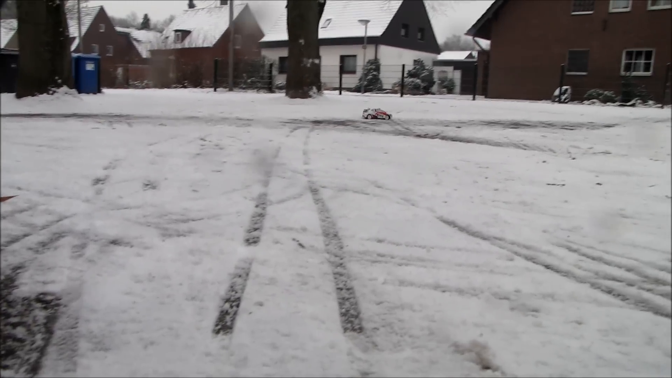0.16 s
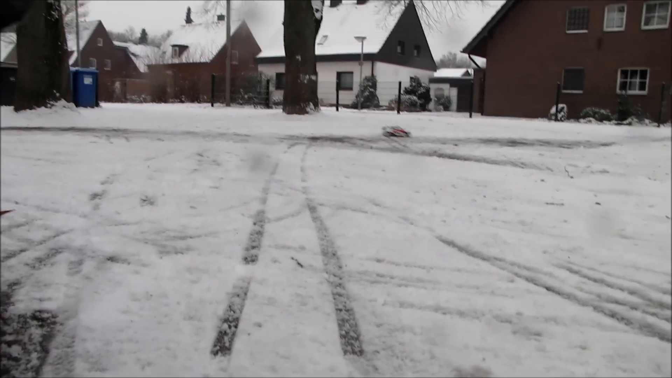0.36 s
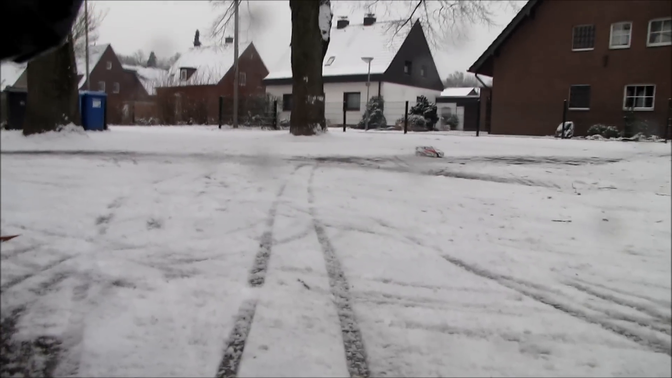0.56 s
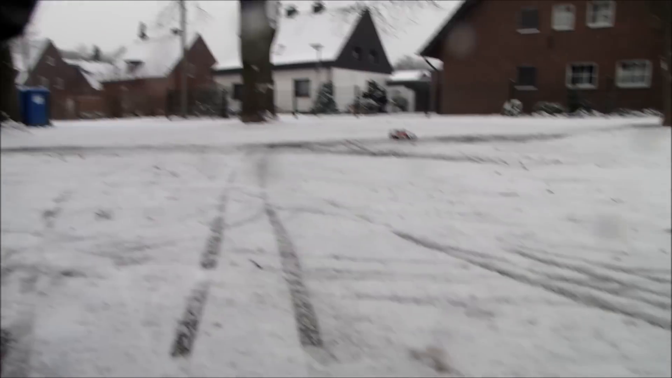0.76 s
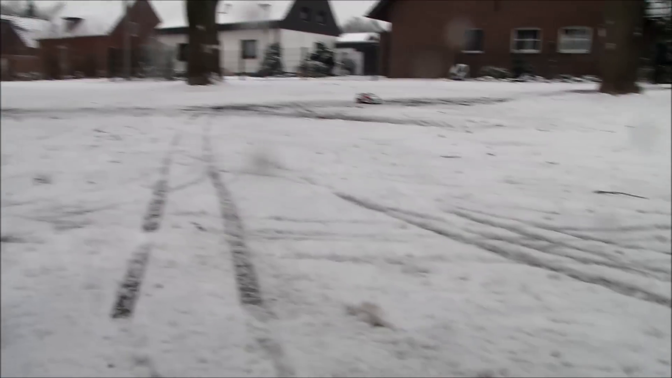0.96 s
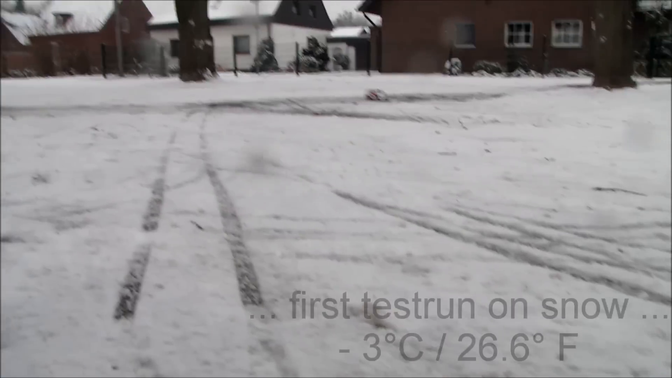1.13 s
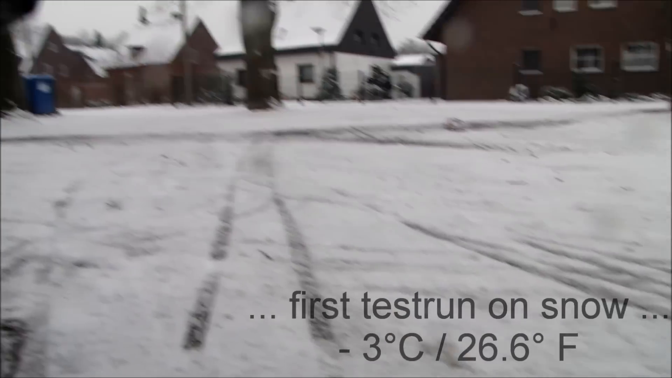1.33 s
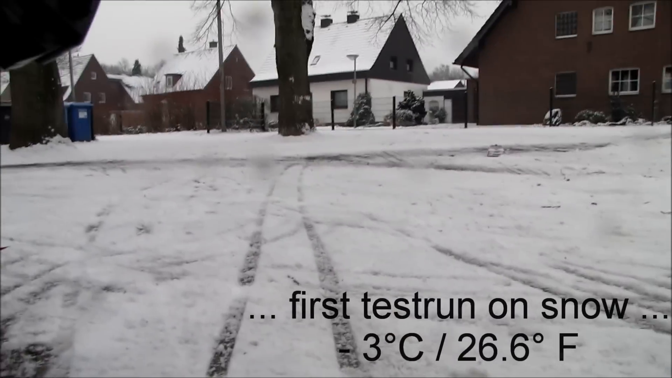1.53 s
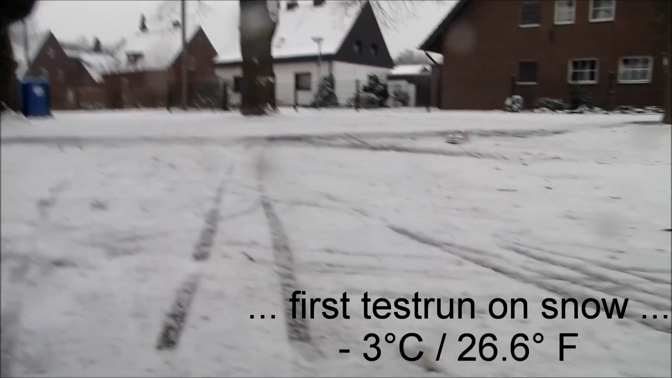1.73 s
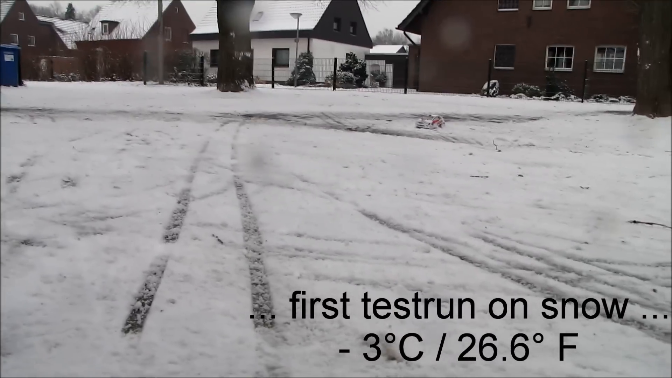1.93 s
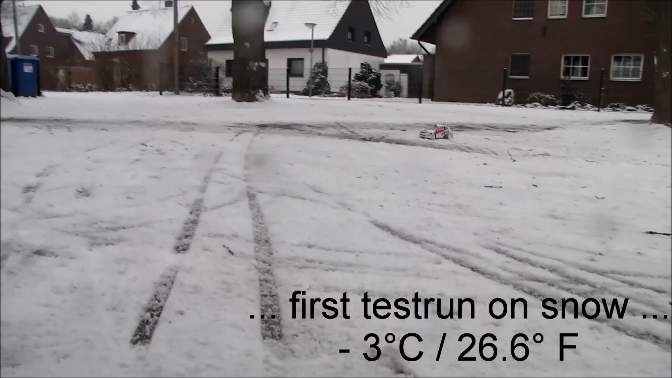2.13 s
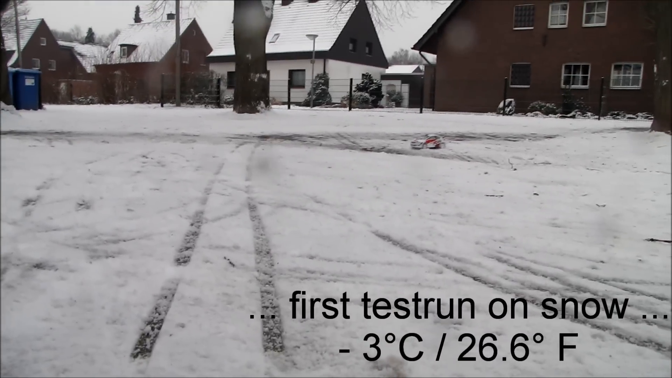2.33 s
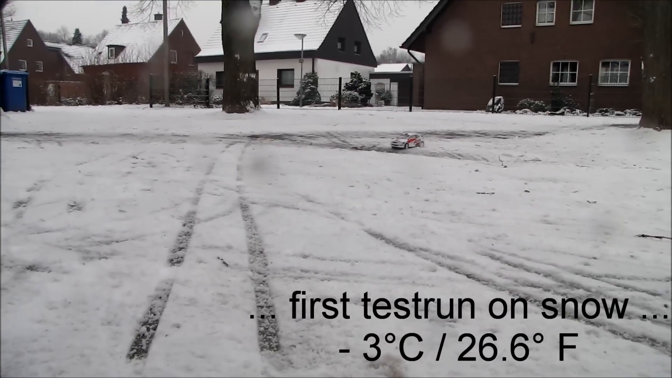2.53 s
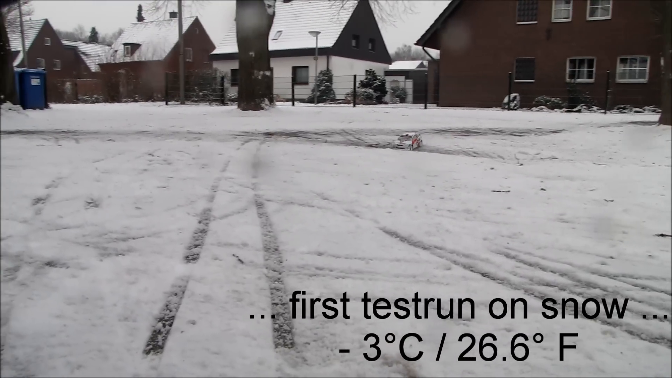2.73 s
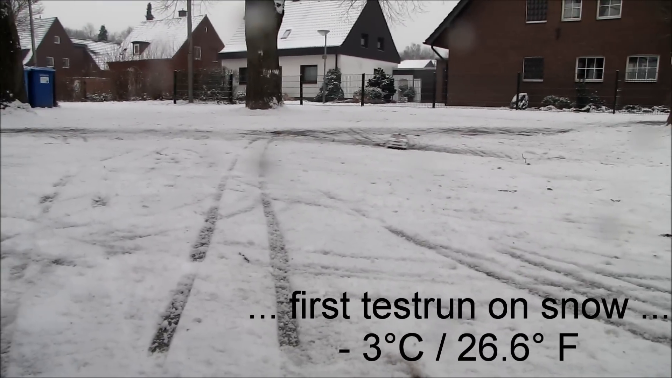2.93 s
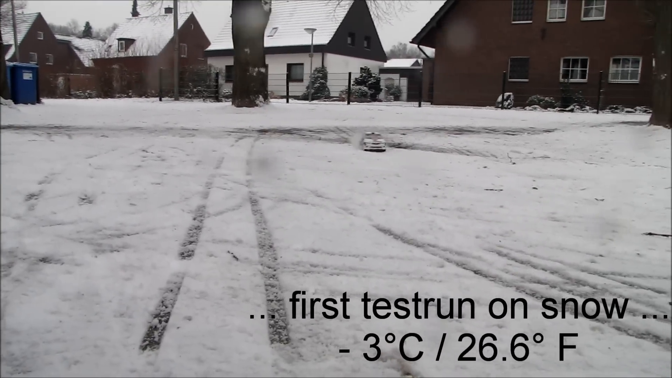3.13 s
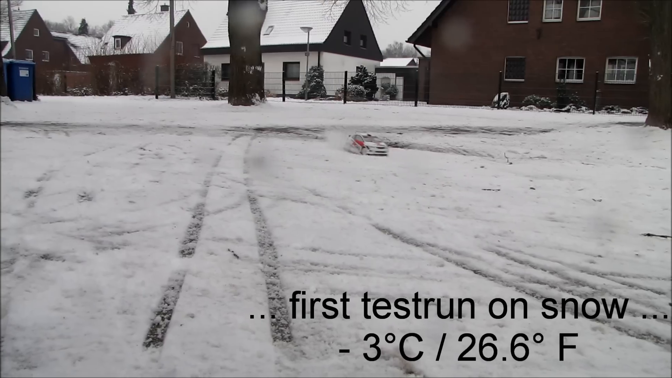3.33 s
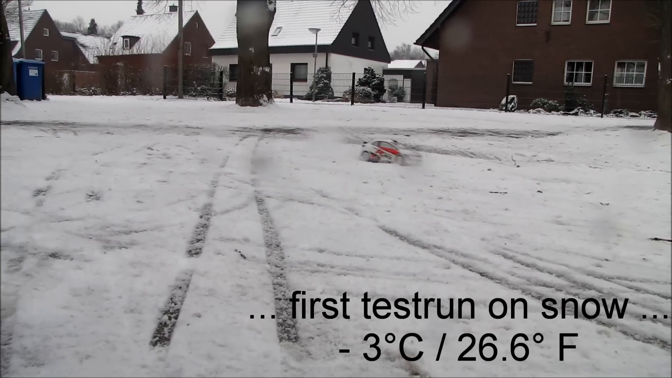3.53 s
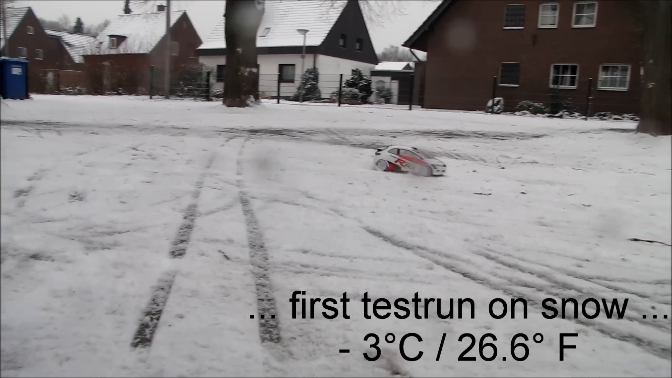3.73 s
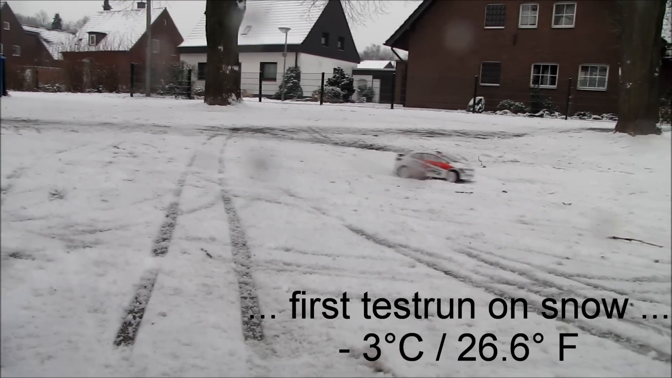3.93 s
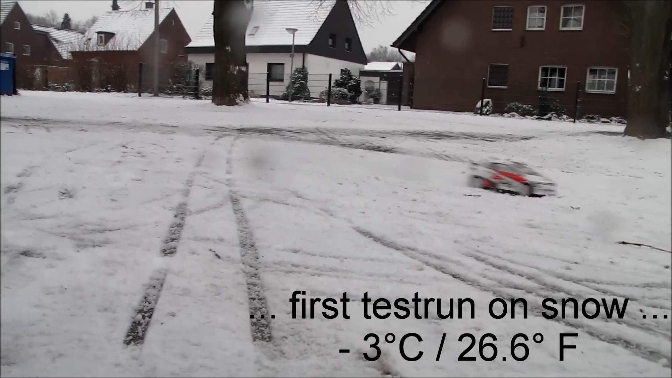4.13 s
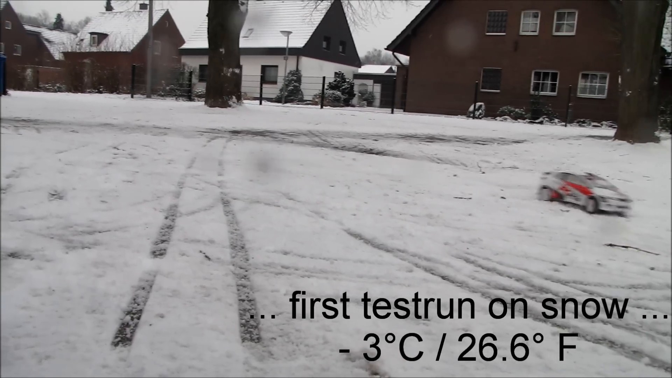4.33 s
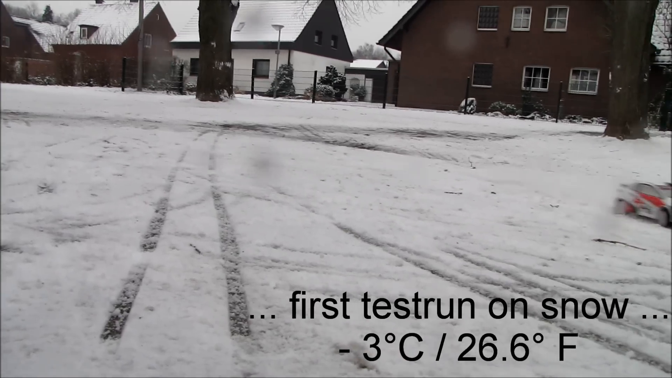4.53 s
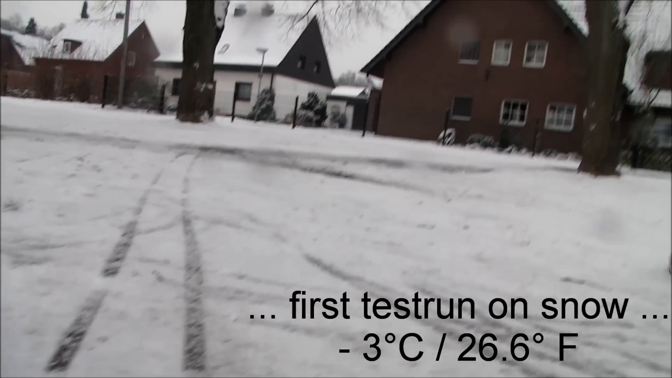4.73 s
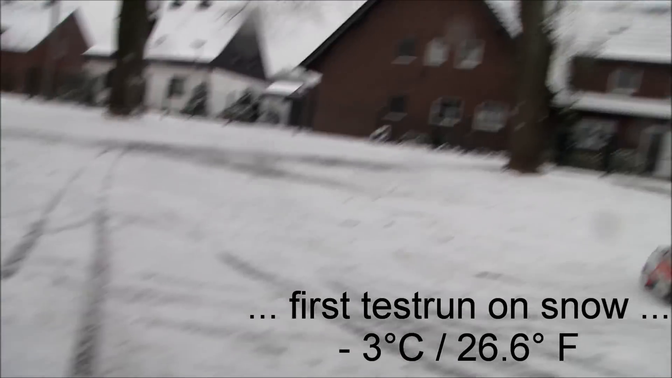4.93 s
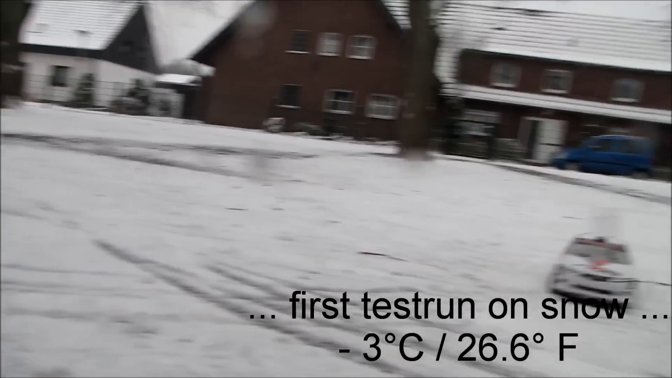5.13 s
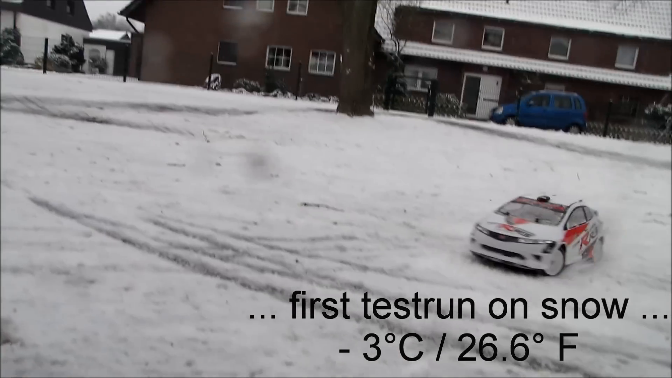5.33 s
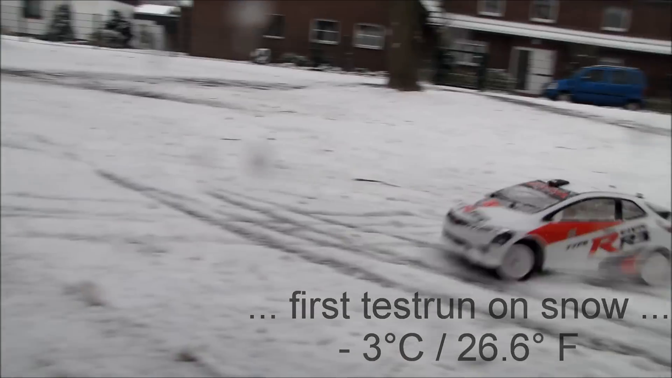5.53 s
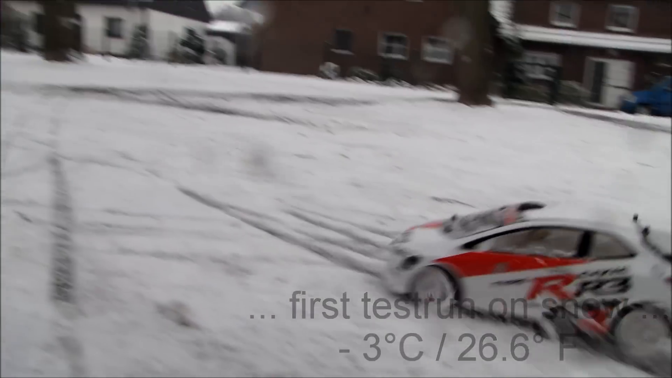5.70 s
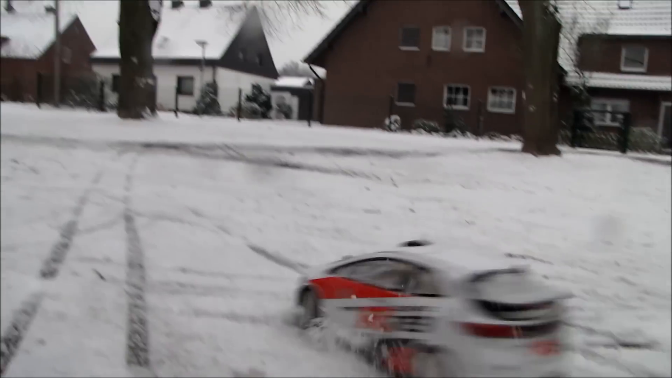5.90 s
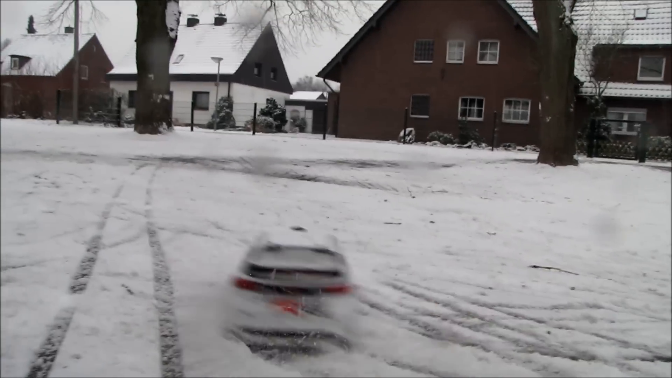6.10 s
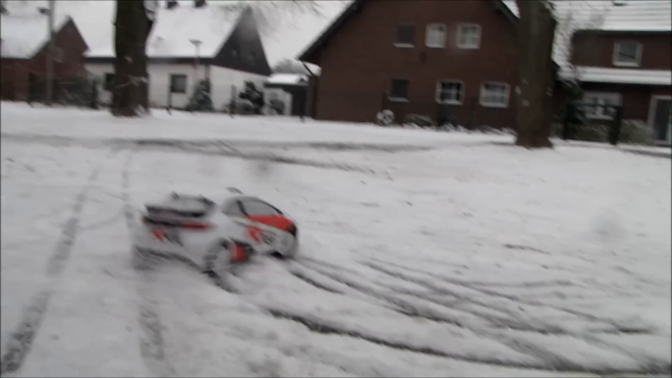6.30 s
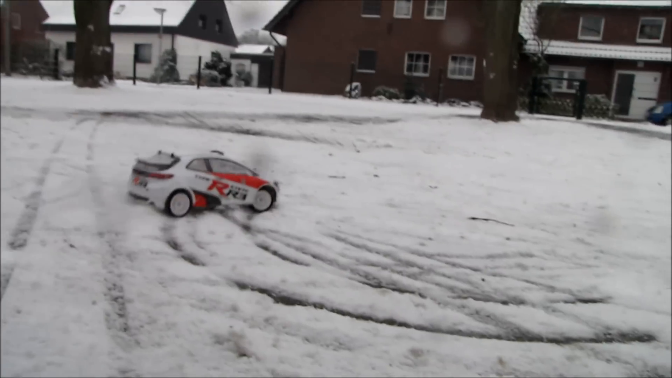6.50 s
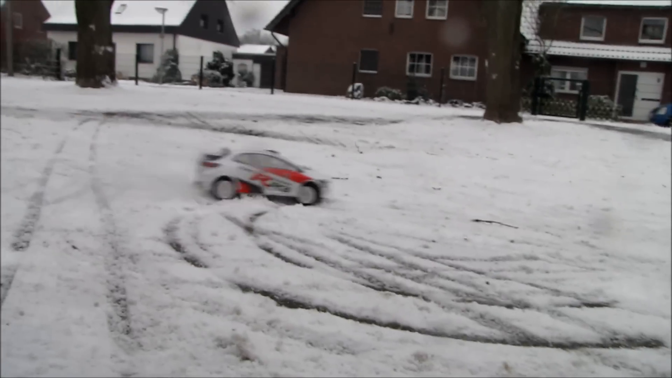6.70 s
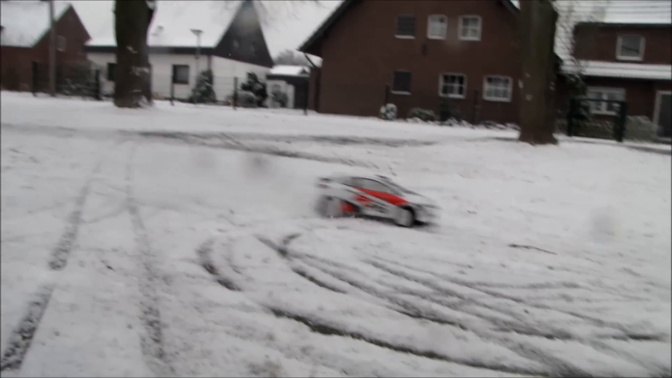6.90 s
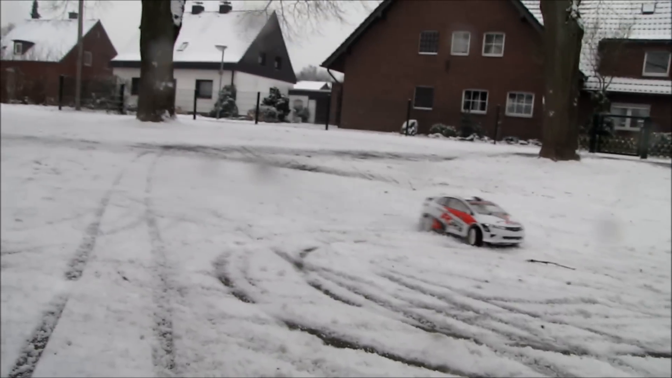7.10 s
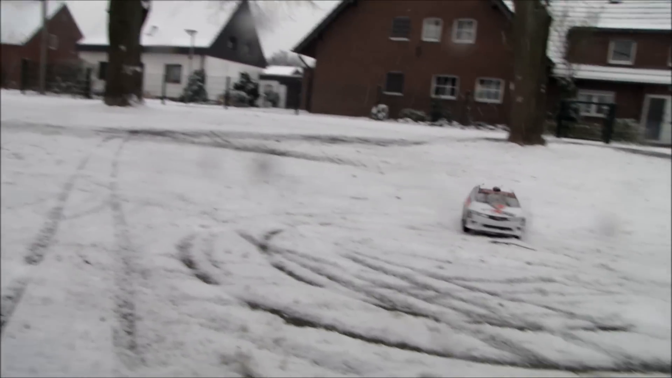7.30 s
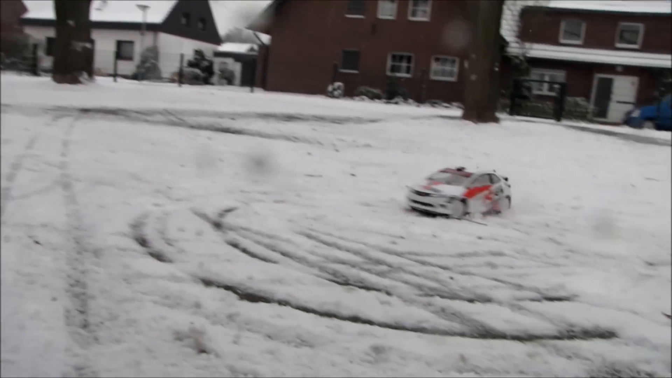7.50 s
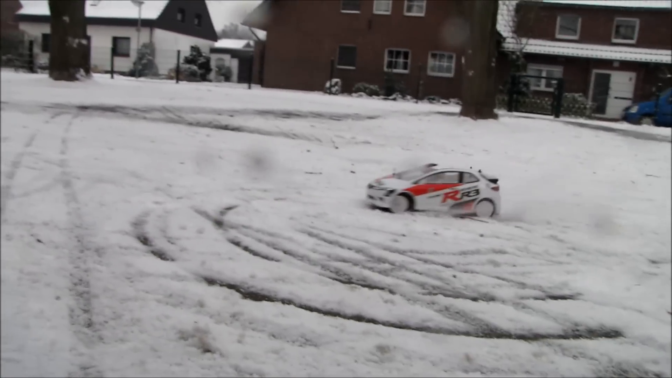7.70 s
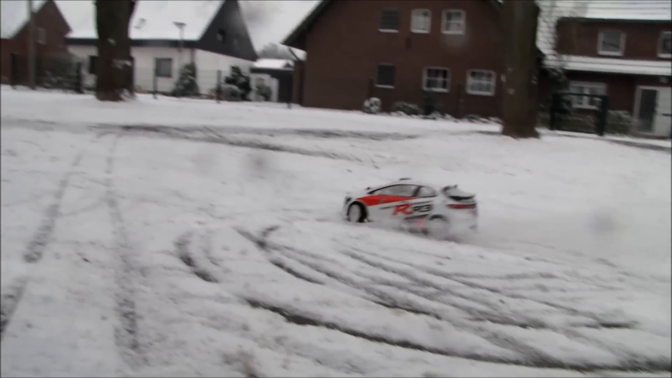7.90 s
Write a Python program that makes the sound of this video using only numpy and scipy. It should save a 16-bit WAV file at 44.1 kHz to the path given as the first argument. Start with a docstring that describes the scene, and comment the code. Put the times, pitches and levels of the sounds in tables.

```python
"""A small electric model car revs and slides on a snowy street, from right of centre to the middle and back.
Gears whine as tones tied to motor speed; shell, loose parts and tyres are coloured noise that follows
one effort curve; ice knocks, ticks and snaps are damped rings and short noise bursts.
The steering servo sings a thin tone, house fronts answer softly and a quiet street hums behind."""
import sys
import numpy as np
from scipy import signal
from scipy.fft import rfft, irfft, next_fast_len
from scipy.io import wavfile
from scipy.ndimage import uniform_filter1d, map_coordinates

SR = 44100
rng = np.random.default_rng(int(sys.argv[2]) if len(sys.argv) > 2 else 0)


def wav_out(sig):
    """Save sig, one row per channel (or a flat mono array), as 16-bit PCM at SR to the path in sys.argv[1]."""
    wavfile.write(sys.argv[1], SR, np.round(np.clip(np.atleast_2d(sig).T, -1, 1) * 32767).astype(np.int16))


def voltage_ratio(level):
    """Linear amplitude factor for a level in decibels (scalar or array-like)."""
    return 10 ** (np.asarray(level, float) / 20)


N = 350595

# how hard the wheels work, as heard by the listener: (time [s], level [dB])
EFFORT_DB = [(0.0, -36.5), (0.113, -38.5), (0.305, -49), (0.366, -45.5), (0.47, -37.5), (0.76, -50),
             (1.059, -47), (1.152, -50.5), (1.35, -51.5), (1.5, -51.5), (1.6, -47), (1.727, -47),
             (1.756, -50.5), (1.921, -49.5), (2.058, -61), (2.148, -54), (2.188, -44.5), (2.249, -61),
             (2.334, -64), (2.36, -44), (2.4, -44), (2.772, -32), (3.17, -35), (3.46, -31), (3.593, -36),
             (3.785, -44), (3.86, -49.5), (3.924, -37.5), (4.04, -24), (4.156, -29), (4.238, -34.5),
             (4.357, -39.5), (4.473, -27.5), (4.554, -25.5), (4.659, -36), (4.696, -34), (4.772, -39),
             (4.966, -31.5), (5.1, -38), (5.254, -21), (5.413, -25), (5.489, -19.5), (5.671, -22.5),
             (5.738, -28), (5.846, -23), (5.912, -26.5), (6.008, -19.5), (6.246, -19.5), (6.313, -25.5),
             (6.374, -22.5), (6.473, -23.5), (6.586, -21), (6.67, -26.5), (6.818, -20.5), (6.978, -23.5),
             (7.108, -33), (7.16, -27.5), (7.242, -26), (7.483, -29.5), (7.779, -23.5), (7.953, -23.5)]
# car near or far: (time [s], share of the near colour [0..1])
NEAR_SHARE = [(3.9, 0), (5.2, 1)]
# colour of ice ticks and cracks: (frequency [Hz], relative density [dB per Hz])
ICE_COLOUR = [(1500, -22), (3500, 0), (6000, -1), (9000, -7), (12000, -14), (16000, -28)]


def unit(x):
    """Scaled to rms 1."""
    return x / np.sqrt(np.mean(x ** 2) + 1e-20)


def along(points, hz):
    """(Hz, value) points interpolated on a log frequency axis."""
    f, v = np.transpose(points)
    return np.interp(np.log(hz + 1), np.log(f + 1), v)


def curves(rows):
    """One value per sample for each column after the time."""
    s, *cols = np.transpose(rows)
    return [np.interp(np.arange(N) / SR, s, c) for c in cols]


def wobble(knots_per_s):
    """A smooth random curve through normally distributed knots."""
    knots = rng.standard_normal(int(N * knots_per_s / SR) + 4)
    return map_coordinates(knots, [np.arange(N) * knots_per_s / SR])


def gate(start_s, end_s, rise_s, fall_s):
    """1 from start to end, with a linear rise before and fall after."""
    return curves([(start_s - rise_s, 0), (start_s, 1), (end_s, 1), (end_s + fall_s, 0)])[0]


def grit(per_s, spread_db, life_s):
    """Envelope of random bursts with a sharp start and exponential decay, a few of them strong."""
    burst_db = spread_db * np.minimum(rng.exponential(size=N), 2.5)
    starts = (rng.random(N) < per_s / SR) * voltage_ratio(burst_db)
    return unit(signal.lfilter([1], [1, -np.exp(-1 / (life_s * SR))], starts))


def rush(spectrum, envelope, alike):
    """Stereo noise of rms 1 under an envelope, coloured, partly alike left and right."""
    m = next_fast_len(N + 8192)
    hz = np.fft.rfftfreq(m, 1 / SR)
    turn = np.arccos(np.clip(along(alike, hz), 0, 1)) / 2  # splits power between mid and side
    z = rfft(envelope * rng.standard_normal((2, N)), m)
    z = z * voltage_ratio(along(spectrum, hz)) * [np.cos(turn), np.sin(turn)]
    mid, side = irfft(z, m)[:, :N]
    return unit(np.array([mid + side, mid - side]))


def puff(spectrum, t):
    """Coloured noise of rms 1, as long as t."""
    z = rfft(rng.standard_normal(len(t)))
    colour_db = along(spectrum, np.fft.rfftfreq(len(t), 1 / SR))
    return unit(irfft(z * voltage_ratio(colour_db), len(t)))


def strike(rows, sound):
    """One 50 ms sound for each (s, dB, ..) row."""
    out, t = np.zeros(N + SR), np.arange(SR // 20) / SR
    for s, db, *rest in rows:
        out[round(s * SR):][:len(t)] += voltage_ratio(db) * sound(t, *rest)
    return out[:N]


def sides(pan_db):
    """Left and right gains, left over right by pan_db."""
    return voltage_ratio(np.array([pan_db / 2, -pan_db / 2]))


def mesh():
    """Tooth mesh rate and bite through all throttle bursts, and where the throttle is open."""
    # motor speed, one list per throttle burst: (time [s], tooth mesh [Hz])
    revs = [
        [(0.38, 912), (0.44, 1142), (0.5, 1200), (0.62, 966)],
        [(0.9, 2080), (0.95, 2200), (1.07, 2230), (1.12, 2140), (1.25, 2170), (1.29, 2260), (1.47, 2300)],
        [(1.58, 729), (1.64, 1017), (1.7, 976), (1.76, 979)],
        [(2.36, 1750), (2.4, 1750)],
        [(2.44, 980), (2.5, 1020), (2.56, 1222), (2.62, 1639), (2.68, 1749), (2.74, 1408), (2.8, 1363)],
        [(2.97, 1520), (3.01, 1650), (3.04, 1930), (3.09, 2048), (3.13, 2317), (3.26, 2300), (3.31, 2430),
         (3.36, 2230), (3.43, 2150), (3.5, 1968)],
        [(3.95, 1030), (3.98, 1930), (3.993, 2210), (4.015, 2880), (4.05, 4060), (4.09, 3380), (4.12, 3250),
         (4.16, 2700)],
        [(4.42, 1199), (4.44, 1271), (4.5, 2833), (4.515, 2746), (4.56, 2257)],
        [(4.945, 1000), (4.96, 960)],
        [(5.175, 950), (5.19, 1020)],
        [(5.44, 1170), (5.47, 1632), (5.52, 3188), (5.57, 2817), (5.6, 2270)],
        [(5.835, 950), (5.855, 920)],
        [(5.925, 880), (5.97, 950)],
        [(6.04, 2480), (6.1, 3000), (6.12, 3400), (6.145, 3700), (6.17, 3450), (6.2, 3060), (6.25, 2540),
         (6.3, 1970)],
        [(6.66, 1177), (6.685, 1326), (6.71, 1652), (6.765, 1663), (6.83, 2975), (6.9, 3313), (6.97, 3019),
         (7.0, 2640), (7.03, 2119)],
        [(7.17, 1533), (7.23, 2017), (7.29, 2090), (7.36, 2121)],
        [(7.49, 1520), (7.55, 1474), (7.6, 1561), (7.65, 1789), (7.7, 1789), (7.75, 1996), (7.8, 1997),
         (7.875, 2241), (7.91, 2310), (7.95, 2320)],
    ]
    # how the teeth bite in each burst: (mesh over effort [dB], octave over mesh [dB],
    # second gear pair over mesh [dB], speed hunting [%])
    bite = [(0, -14, -20, 4), (-6, 0, -14, 3), (3, -25, -25, 6), (0, -20, -20, 1), (3, -16, -20, 2),
            (-4, -5, -20, 1.3), (-5, -1, -14, .7), (-4, -4, -14, 1.4), (2, -20, -20, 2), (2, -20, -20, 2),
            (1, -7, -14, 1.2), (1, -20, -20, 2), (1, -20, -20, 2), (-2, -11, -13, 1.2), (-2, -3, -6, .6),
            (-5, -4, -8, 1.2), (1, -5, -13, .9)]
    throttle = sum(gate(burst[0][0], burst[-1][0], 0.02, 0.028) for burst in revs)
    rows = [point + teeth for burst, teeth in zip(revs, bite) for point in burst]
    return curves(rows), np.minimum(throttle, 1)


def gears():
    """Tones tied to motor speed sound through the chassis; uneven teeth blur their pitch and break them up."""
    # how well a tone radiates: (frequency [Hz], gain [dB])
    chassis = [(700, -6), (1050, 0), (1500, -2), (2400, -1), (3050, -3), (3450, -6), (3800, -3), (4200, 4),
               (4700, 3), (5600, -5), (6800, -1), (9000, -9), (14000, -19)]
    gear_ratio, slot_ratio = 1.53, 4.27  # second gear pair and motor slots over the tooth mesh
    slot_db = -13  # motor slots over the effort
    echo_hz, echo_width_hz, echo_db = 2080, 220, -16  # from afar the echo off the snow cancels tones here
    load_db_s, load_top_db = 0.6, 5  # dB per relative speed change a second; limit

    (hz, bite_db, octave_db, pair_db, hunting_pct), throttle = mesh()
    phase = 2 * np.pi * np.cumsum(hz * (1 + hunting_pct / 100 * wobble(85))) / SR

    # teeth press harder while speed rises
    rise_per_s = np.maximum(np.gradient(np.log(hz)), 0) * SR
    load_db = np.minimum(load_db_s * uniform_filter1d(rise_per_s, size=600), load_top_db)
    level_db = curves(EFFORT_DB)[0] + load_db
    far = 1 - curves(NEAR_SHARE)[0]

    tones = [(1, bite_db), (2, bite_db + octave_db), (gear_ratio, bite_db + pair_db), (slot_ratio, slot_db)]
    out = np.zeros(N)
    for ratio, tone_db in tones:
        tone_hz = ratio * hz
        notch_db = far * echo_db * np.exp(-((tone_hz - echo_hz) / echo_width_hz) ** 2)
        path_db = along(chassis, tone_hz) + notch_db
        flutter_db = 3 * wobble(100) + (1.8 + 0.5 * hunting_pct) * wobble(30)
        tone = np.sin(ratio * phase + 0.6 * wobble(250))
        out += voltage_ratio(level_db + tone_db + path_db + flutter_db) * tone * (tone_hz < 16000)
    return throttle * out


def rolling():
    """Effort drives boom, rattle, crunch and spray; bumps and jolts shake them; snow breaks in grains."""
    # layer balance, added to what effort gives: (time [s], boom [dB], crunch [dB], spray [dB])
    balance = [(0, -1, 2, 6.5), (.5, -2.5, 7, 5), (1.25, -1.5, 2.5, 7.5), (1.7, 5, -2.5, 3),
               (2.2, -3.5, -4.5, 2), (2.4, -0.5, -6.5, 1), (2.8, 2.5, -0.5, 2), (3.4, 1, -7, 2.5),
               (3.7, 3.5, -11.5, -5), (3.93, 0.5, -6, -5), (4.02, 0, -6, 5), (4.3, 4.5, -7.5, 6.5),
               (4.6, 2, -4.5, 3), (5.1, 1, -9.5, -3), (5.5, -0.5, -9.5, -1.5), (5.9, 2.5, -5, 1.5),
               (6.1, -2.5, -6.5, -7), (6.5, -2.5, -9.5, 0), (6.9, -2.5, -6.5, -1.5), (7.3, -2, -8, -4),
               (7.95, -2.5, -10, -0.5)]
    # colours of shell boom, loose drive parts near and far (echo off the snow cancels a band), crunch
    # and spray: (frequency [Hz], relative density [dB per Hz])
    boom_colour = [(60, -16), (120, -15.5), (190, -11.5), (250, 0), (300, 1.5), (400, -4.5), (480, -16.5),
                   (650, -9.5), (750, -7), (850, -20.5), (1200, -44.5)]
    rattle_near, rattle_far = [(470, -52), (800, -12), (833, -15.5), (940, 1), (1120, -2.5), (1350, 1),
                               (1870, -0.5), (2050, -2.5), (2460, 0), (2840, -3), (3160, -5.5),
                               (3430, -5.5), (4000, -33), (5200, -38), (8800, -120)], [(290, -22), (500, -3.5), (545, -16), (661, -2), (773, -20),
                                               (828, -10), (1010, 1), (1510, -1.5), (1690, -4.5),
                                               (2120, -13), (2460, -6.5), (3570, -14.5), (4000, -16),
                                               (5200, -46), (8800, -120)]
    crunch_colour, spray_colour = [(2000, -15), (3400, -2.5), (4030, 2), (4360, 2), (5030, -2), (6630, -3),
                                   (8030, -8.5), (9000, -16.5), (11700, -26), (19800, -120)], [(5000, -56), (8500, 4), (11600, 4), (14400, 1),
                                                   (15000, 1.5), (16200, -33)]
    # stereo likeness: (frequency [Hz], left-right likeness [0..1])
    alike = [(400, 0.99), (1000, 0.88), (3000, 0.77), (8000, 0.61), (14000, 0.71)]
    usual_db = -35  # effort at which the layers have the levels below, before the layer balance
    boom_db, rattle_db, crunch_db, spray_db = -36, -35, -35, -51
    boom_grows, crunch_grows, spray_grows = 0.72, 1.252, 1  # dB per dB of effort
    mesh_per_turn = 40  # tooth contacts per turn of the drive shaft

    more_db = curves(EFFORT_DB)[0] - usual_db
    boom_more_db, crunch_more_db, spray_more_db = curves(balance)
    near = curves(NEAR_SHARE)[0]
    bumps = voltage_ratio(1.12 * wobble(18) + 1.34 * wobble(45))
    shaft = np.cos(2 * np.pi * np.cumsum(mesh()[0][0]) / SR / mesh_per_turn)
    jolts = grit(per_s=120, spread_db=3.0, life_s=0.0028)
    grains = grit(per_s=180, spread_db=4.5, life_s=0.0012)

    boom = rush(boom_colour, bumps * (1 + 0.4 * jolts), alike)
    boom *= voltage_ratio(boom_db + boom_grows * more_db + boom_more_db)

    shake = bumps * voltage_ratio(1.4 * shaft) * (1 + 0.2 * jolts)  # beats once a shaft turn
    rattle = np.sqrt(near) * rush(rattle_near, shake, alike)
    rattle += np.sqrt(1 - near) * rush(rattle_far, shake, alike)
    rattle *= voltage_ratio(rattle_db + more_db)

    crunch = rush(crunch_colour, bumps * (1 + 0.22 * jolts + 0.4 * grains), alike)
    crunch *= voltage_ratio(crunch_db + crunch_grows * more_db + crunch_more_db)

    clods = grit(per_s=60, spread_db=0, life_s=0.0014)
    flying = voltage_ratio(2.2 * wobble(35)) * (1 + 0.29 * jolts + 0.33 * clods)
    spray = rush(spray_colour, flying, alike)
    spray *= voltage_ratio(spray_db + spray_grows * more_db + spray_more_db)
    return boom + rattle + crunch + spray


def servo():
    """The steering servo holds against the snow with a thin tone, wavering in level and slightly in pitch."""
    # spells of steering: (start [s], end [s], level before the final gain [dB])
    spells = [(.93, 1.1, -63), (1.17, 1.36, -65), (1.85, 2, -68), (4.28, 4.43, -50), (4.8, 5, -52),
              (5.8, 5.9, -48), (6.28, 6.56, -47)]
    on = sum(voltage_ratio(db) * gate(start, end, 0.01, 0.01) for start, end, db in spells)
    phase = 2 * np.pi * np.cumsum(5780 + 10 * wobble(40)) / SR  # Hz
    return 1.4 * on * voltage_ratio(2.5 * wobble(30)) * np.sin(phase)


def knocks():
    """Ice and grit hit the shell: a few damped turns of ringing with a puff of noise."""
    # (time [s], level [dB], ring [Hz])
    hits = [(0.211, -33, 1210), (0.476, -36, 1170), (1.723, -24, 1010), (2.189, -39, 999),
            (2.356, -34, 676), (3.19, -17, 1520), (3.92, -18.5, 1200), (3.956, -14, 1210),
            (4.562, -14.5, 1110), (4.611, -18.5, 651), (4.693, -24, 760), (5.048, -16.5, 980),
            (5.268, -16, 676), (5.669, -3.5, 1600), (6.108, -3, 1480), (6.592, -1, 2510),
            (6.627, -7.5, 1160), (6.829, 1, 3000), (7.242, -12.5, 1280), (7.314, -3, 1280),
            (7.442, -9, 1770), (7.765, -1, 2180)]
    # colour of the puff: (frequency [Hz], relative density [dB per Hz])
    thud = [(300, -6), (600, -3), (1300, -4), (2500, 1.5), (5000, -13), (12000, -37)]

    def knock(t, hz):
        ring = np.exp(-t * hz / 3) * (1 - np.exp(-t * hz * 1.6)) * np.sin(2 * np.pi * hz * t)
        return 0.97 * ring + 0.13 * puff(thud, t) * np.exp(-t / 0.0047)
    return strike(hits, knock)


def ticks():
    """Ice lumps tick: very short bright noise bursts."""
    # (time [s], level [dB])
    hits = [(0.8619, -28), (0.93, -27.5), (1.0106, -28), (1.049, -26), (1.1757, -30), (2.5062, -25.5),
            (2.656, -16.5), (2.7194, -15.5), (2.83, -17.5), (2.889, -14), (3.5199, -23), (3.5493, -25),
            (4.2702, -28), (5.0769, -26), (5.246, -24), (5.3363, -29), (5.3762, -32), (5.436, -16),
            (5.5594, -20), (6.1978, -11), (7.4145, -27)]
    return strike(hits, lambda t: 0.55 * puff(ICE_COLOUR, t) * np.exp(-t / 0.0032))


def snaps():
    """Sharp snaps close by: a hard dry crack with ringing modes, then a duller knock a moment later."""
    # (time [s], level [dB], after-knock before its 5 dB lift [dB], left over right [dB])
    hits = [(3.4999, -5, -8.5, 3.5), (3.614, -8.5, -31, 8), (3.8174, -2.5, -10, 7)]
    # ringing modes: (frequency [Hz], level [dB], 60 dB decay [s])
    modes = [(5340, 5.5, 0.002), (6660, -12, 0.0044)]
    # colour of the after-knock: (frequency [Hz], relative density [dB per Hz])
    dull = [(400, -24), (700, -6), (1500, -1), (3000, 0), (4500, -26)]

    def snap(t, low_db):
        ring = sum(voltage_ratio(db - 60 * t / t60) * np.sin(2 * np.pi * hz * t) for hz, db, t60 in modes)
        crack = 0.19 * puff(ICE_COLOUR, t) * (np.exp(-t / 0.00042) + 0.18 * np.exp(-t / 0.0049))
        after = voltage_ratio(low_db + 5) * puff(dull, t) * t / 0.003 * np.exp(-t / 0.0018)
        return (ring + crack) * (1 - np.exp(-t / 0.00016)) + after
    return sum(strike([row[:3]], snap) * sides(row[3])[:, None] for row in hits)


def bearing(x):
    """With the car to the right, the left side hears it softer and a little later."""
    # (time [s], share of the way to the right [1 = full])
    track = [(0, 0.38), (3.2, 0.37), (4, 0.3), (4.6, 0.94), (5.9, 0.72), (6.4, -0.035), (6.8, -0.027),
             (7.2, 0.55), (7.95, 0.52)]
    pan_db = 2  # right over left at bearing 1
    lag_ahead_ms, lag_ms = 0.0072, 0.086  # lag of the left at bearing 0; added at bearing 1
    share, = curves(track)
    left, right = x * sides(-pan_db * share)
    lag_samples = (lag_ahead_ms + lag_ms * share) * SR / 1000
    return np.array([map_coordinates(left, [np.arange(N) - lag_samples]), right])


def houses(x):
    """A short soft answer from house fronts across the snow: convolution with decaying noise."""
    t = np.arange(SR // 4) / SR
    tail = rng.standard_normal((2, len(t))) * voltage_ratio(-60 * t / 0.076)  # 60 dB in 76 ms
    return signal.fftconvolve(x, tail / np.linalg.norm(tail[0]), axes=1)[:, :N]


def street():
    """A low street hum of coloured noise, its level dipping late on while the car is loud."""
    # (time [s], level [dB])
    hum_level = [(0, -43.5), (6, -43), (7.2, -48), (7.95, -45)]
    # (frequency [Hz], relative density [dB per Hz])
    hum_colour = [(15, -9), (30, -1), (100, -1), (200, -5.5), (400, -13.5), (800, -17.5), (2000, -22),
                  (5000, -29), (16000, -47)]
    alike = [(30, 0.8), (200, 0.99), (2000, 0.22), (10000, 0.11)]  # (Hz, left-right likeness)
    return voltage_ratio(curves(hum_level)[0]) * rush(hum_colour, voltage_ratio(0.7 * wobble(5.3)), alike)


def scene():
    """Car, nearby snaps and the street."""
    both = np.ones((2, 1))
    tones = (gears() + servo()) * both
    struck = (knocks() + ticks()) * both
    car = rolling() + tones + voltage_ratio(-7) * houses(tones) + struck + voltage_ratio(-13) * houses(struck)
    near = snaps()
    return bearing(car) + near + voltage_ratio(-34) * houses(near) + street()


def roll_off(x):
    """The treble ends steeply here."""
    return signal.sosfilt(signal.butter(12, 16500, fs=SR, output="sos"), x)


def record(dry):
    """Output of the finished mix."""
    return roll_off(dry)


dry = scene()
out = record(dry)
wav_out(out)
```